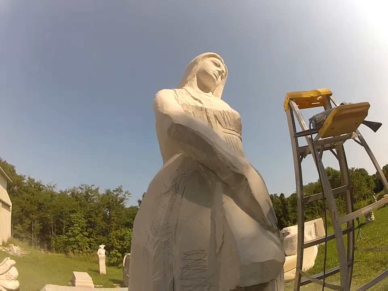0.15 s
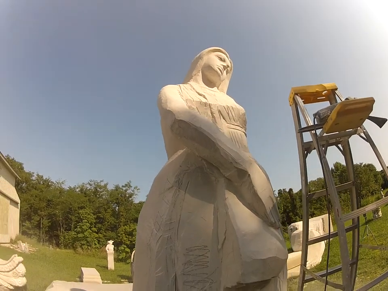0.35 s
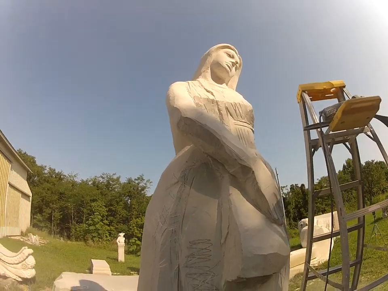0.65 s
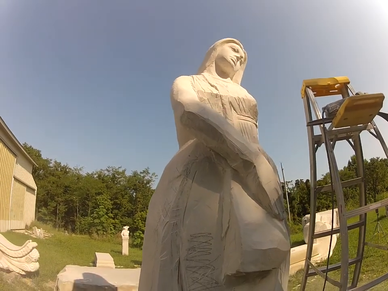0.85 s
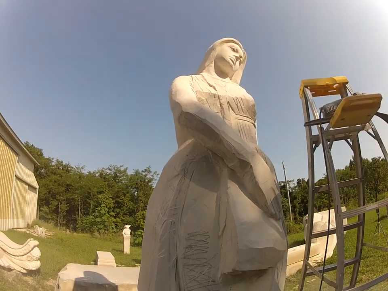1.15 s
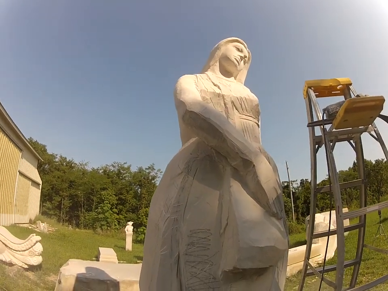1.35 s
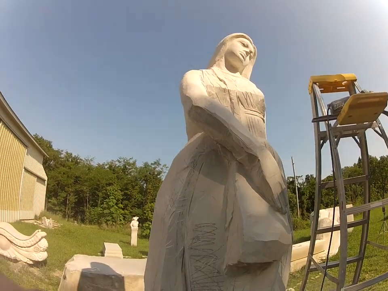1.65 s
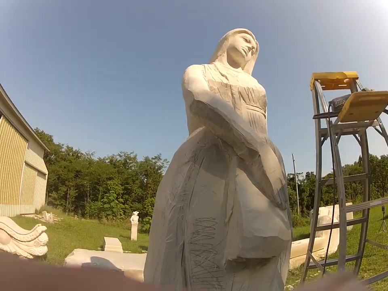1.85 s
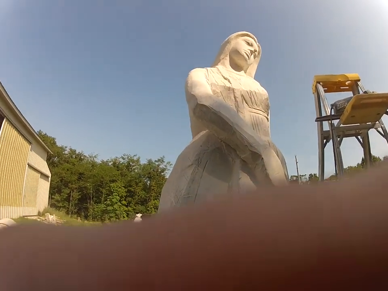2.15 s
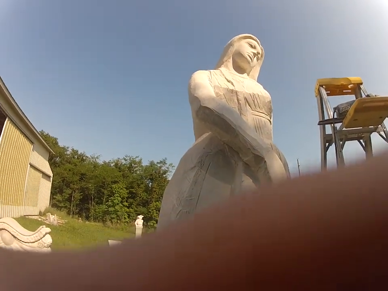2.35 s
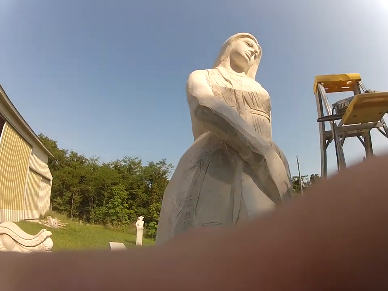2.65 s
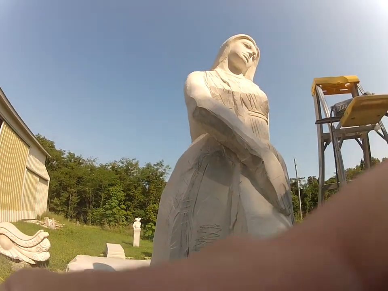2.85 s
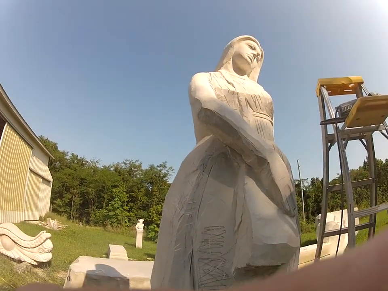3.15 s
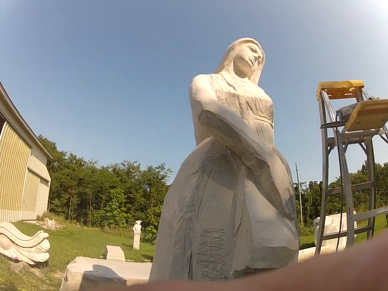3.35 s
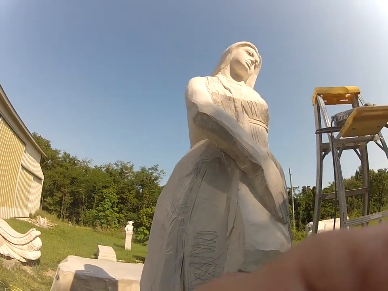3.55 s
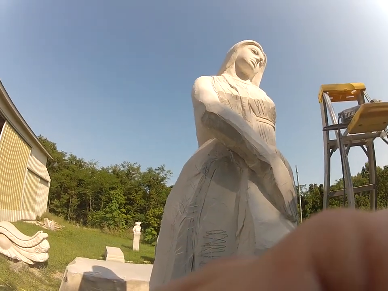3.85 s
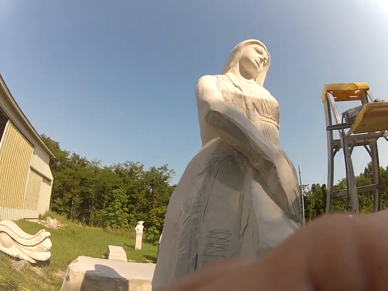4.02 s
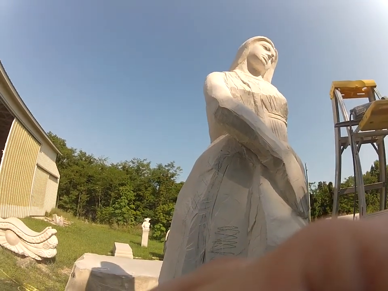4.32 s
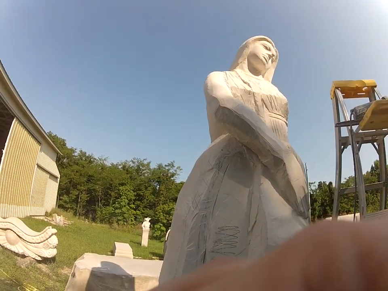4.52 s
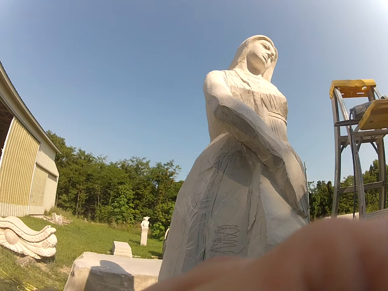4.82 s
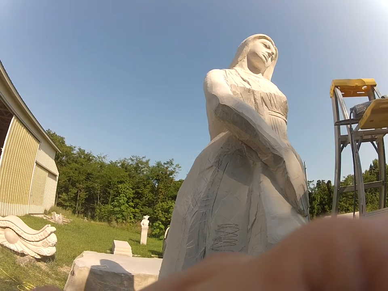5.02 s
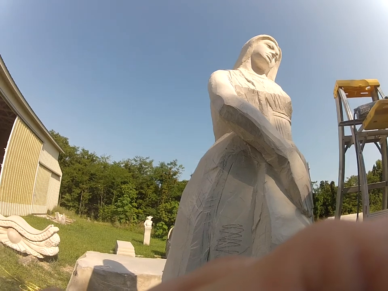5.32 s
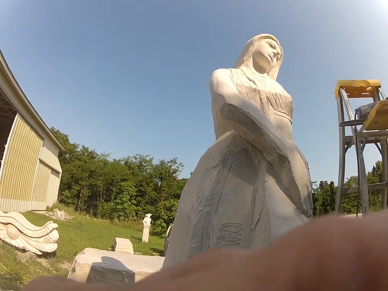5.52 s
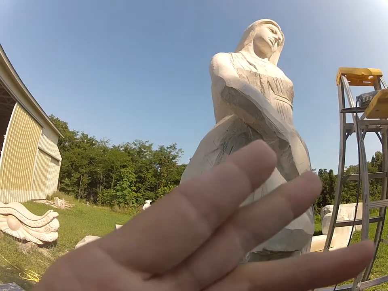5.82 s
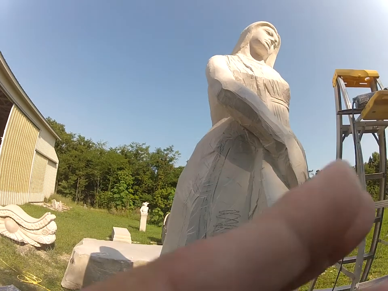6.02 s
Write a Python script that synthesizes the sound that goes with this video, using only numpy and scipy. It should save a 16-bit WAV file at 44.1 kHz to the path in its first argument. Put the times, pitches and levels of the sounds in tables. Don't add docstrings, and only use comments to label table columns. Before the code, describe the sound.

Gritty gear chatter and a falling thin whine from a stopping grinder, with loud close thumps, fingernail clicks and skin squeaks on plastic.

```python
import sys
import numpy as np
from scipy import signal
from scipy.fft import rfft, irfft
from scipy.io import wavfile
from scipy.ndimage import uniform_filter1d, map_coordinates

SR = 44100
rng = np.random.default_rng(int(sys.argv[2]) if len(sys.argv) > 2 else 0)


def undo_db(level):
    steps = np.asarray(level, float) / 20
    return 10 ** steps


def materialize(psi):
    bounded = np.clip(np.atleast_2d(psi).T, -1, 1)
    quanta = np.round(bounded * 32767).astype(np.int16)
    wavfile.write(sys.argv[1], SR, quanta)


N = 272538
HOLD_HZ = 12000

# hz, gain_db
YARD_COLOUR = [(70, -21.5), (110, -3.5), (200, -1), (400, -6), (800, -15), (1500, -9), (5900, -43)]
# time_s, level_db
YARD_LEVEL = [(0, -62), (3, -59.5), (6.18, -64.5)]

# time_s, level_db
TREMBLE_LEVEL = [(0.0, -60.5), (1.7, -56), (1.89, -48.5), (2.29, -55), (3.34, -54.5), (3.6, -38.5),
                 (3.77, -51.5), (4.44, -56.5), (5.56, -53), (5.82, -60), (6.18, -64)]
# hz, gain_db
MOUNT_COLOUR = [(15, -26), (30, -11), (48, 3), (60, 1.5), (75, -9), (100, -12), (200, -41.5)]
# start_s, first_swing, t60_s
SWINGS = [(1.045, -0.052, 0.26), (1.072, 0.11, 0.11), (1.342, -0.012, 0.47), (1.756, 0.032, 0.18),
          (1.879, -0.057, 0.27), (2.348, 0.023, .18), (2.587, 0.025, 0.36), (2.949, .04, 0.21),
          (3.03, 0.059, 0.23), (4.04, -0.014, 0.25), (4.169, 0.016, 0.18), (5.631, 0.064, .19)]
# start_s, first_swing, ring_hz
KNOCKS = [
    (1.3126, 0.16, 279),
    (1.323, 0.021, 224),
    (2.574, -.04, 141),
    (2.924, 0.07, 126),
    (2.9396, -0.16, 247),
    (3.293, 0.0089, 250),
    (3.418, 0.023, 72),
    (5.595, 0.12, 175),
]
# start_s, first_swing, swing_hz
PUSHES = [
    (3.468, 0.23, 70),
    (3.5746, -0.42, 49),
    (3.5804, 1.33, 134),
    (3.585, -0.098, 30),
    (5.552, .25, 58.7),
    (5.5601, 0.5, 87.5),
    (5.563, -2.3, 108),
    (5.5746, -0.47, 190),
    (5.5765, 1.15, 121),
    (5.62, 0.43, 92),
]
# start_s, peak_db, ring_hz, t60_s, snap
TAPS = [(1.034, -20, 980, 0.0049, -.04), (1.075, -23.5, 1920, 0.01, 0.014),
        (1.313, -9.5, 1160, 0.017, -0.13), (1.322, -25, 1150, 0.018, 0.022),
        (2.9402, -16.5, 1984, 0.016, -0.26), (3.032, -23.5, 1190, 0.018, 0.065),
        (3.292, -23.5, 1970, 0.014, -0.1), (2.869, -39, 2030, 0.011, .005), (3.353, -39, 2300, .008, .005),
        (3.42, -28, 900, 0.0088, 0.044), (5.5542, -36, 1100, .006, 0.059),
        (3.5648, -27.5, 2040, 0.019, .001), (3.5821, -11, 1110, .011, 0.63),
        (3.582, -7.5, 2550, 0.0092, 0.16), (3.609, -19, 2080, 0.014, 0.0055),
        (3.656, -29, 2100, 0.0056, .01), (5.5627, -19.5, 2270, 0.013, 0.096),
        (5.597, -27.5, 1200, 0.016, 0.22), (5.6212, -44, 1000, .0075, 0.11),
        (5.625, -26, 1154, 0.046, -0.018)]

# start_s, hardest_s, end_s, hiss_db, squeak_db
RUBS = [(1.033, 1.083, 1.11, -53, -49), (1.21, 1.246, 1.285, -49.5, -50), (1.293, 1.311, 1.367, -47, -42),
        (1.475, 1.481, 1.515, -64, -64), (1.595, 1.625, 1.668, -57.5, -51),
        (1.745, 1.791, 1.812, -57.5, -51), (1.965, 2.037, 2.11, -56, -49.5), (2.12, 2.24, 2.265, -62, -53),
        (2.28, 2.374, 2.42, -55.5, -44.5), (2.425, 2.432, 2.515, -55, -47), (2.52, 2.57, 2.618, -37.5, -42),
        (2.638, 2.69, 2.708, -56.5, -52), (2.738, 2.792, 2.803, -62, -57), (2.868, 2.92, 2.98, -54, -41.5),
        (2.988, 3.038, 3.1, -53, -39), (3.107, 3.205, 3.22, -54.5, -43), (3.395, 3.477, 3.495, -53.5, -43),
        (3.564, 3.574, 3.582, -49, -43), (3.585, 3.59, 3.715, -82, -53), (3.718, 3.73, 3.768, -57.5, -46),
        (3.98, 4.002, 4.045, -64.5, -50.5), (5.553, 5.568, 5.605, -53.5, -38),
        (5.585, 5.591, 5.603, -43, -32), (5.614, 5.63, 5.655, -50.5, -32)]
# start_s, hardest_s, end_s, drag_db
SHIFTS = [(1.03, 1.06, 1.1, -43.5), (1.29, 1.31, 1.373, -40), (1.49, 1.52, 1.4, -53.5),
          (1.6, 1.625, 1.66, -58), (1.74, 1.8, 1.83, -48.5), (1.97, 2.04, 2.11, -46),
          (2.14, 2.24, 2.29, -46.5), (2.31, 2.42, 2.5, -47), (2.54, 2.61, 2.64, -45.5),
          (2.65, 2.685, 2.71, -50), (2.89, 2.94, 2.985, -39), (2.99, 3.03, 3.13, -38.5),
          (3.14, 3.18, 3.23, -53.5), (3.39, 3.43, 3.51, -42.5), (3.54, 3.59, 3.68, -51),
          (3.71, 3.76, 3.79, -49), (3.98, 4.01, 4.05, -57), (5.55, 5.57, 5.61, -25),
          (5.613, 5.625, 5.66, -44)]
# hz, gain_db
HISS_COLOUR = [(900, -26), (1500, -11.5), (1850, 0), (2400, 0), (2900, -9), (3400, -1.5), (3700, -0.5),
               (4200, -15.5), (5100, -11), (5950, -6.5)]
# hz, gain_db
SQUEAK_COLOUR = [(300, -19.5), (600, -16), (950, -9.5), (1150, -0.5), (1400, -2.5), (1700, -42.5),
                 (2500, -26.5)]
# hz, gain_db
DRAG_COLOUR = [(60, -5), (130, 2.5), (250, -0.5), (500, -13.5), (900, -40.5)]

# first_s, last_s, blow_count, peak_db
RATTLE_RUNS = [(0.0284, 0.147, 4, -35.5), (0.174, 0.196, 2, -33), (0.234, 0.4125, 7, -34.5),
               (0.435, 0.6165, 7, -35), (0.654, 0.755, 4, -33.5), (0.7945, 1.068, 10, -34),
               (1.0953, 1.2503, 7, -36), (1.289, 1.702, 15, -35), (1.7233, 1.9651, 9, -35.5),
               (2.0151, 2.2603, 10, -37), (2.2754, 2.565, 10, -37), (2.641, 2.687, 3, -35.5),
               (2.7394, 3.074, 9, -36), (3.233, 3.4177, 7, -36), (3.474, 3.6526, 5, -33.5),
               (3.6905, 3.944, 10, -38.5), (3.985, 4.003, 2, -38), (4.0283, 4.1685, 4, -37),
               (4.2062, 4.3064, 3, -36.5), (4.3463, 4.6058, 6, -36), (4.6344, 4.7538, 4, -39),
               (4.787, 5.034, 7, -38), (5.0803, 5.166, 3, -38), (5.202, 5.2905, 3, -39),
               (5.335, 5.356, 2, -41), (5.399, 5.467, 2, -37), (5.514, 5.6196, 5, -39.5),
               (5.6755, 5.7255, 3, -39.9), (5.7753, 5.9312, 4, -40.0), (5.976, 6.15, 5, -38.5)]
# centre_hz, width_hz, level_db
BODY_MODES = [(1030, 55, -7), (1143, 91, -2.5), (1380, 70, -4), (1874, 227, -4.5), (2026, 96, 0),
              (2209, 200, -2.5), (2482, 120, -2), (2817, 220, -9.5), (3194, 190, -8.5), (3570, 174, -10),
              (4800, 240, -32.5)]
# hz, gain_db
BODY_BED = [(200, -36), (500, -23), (900, -21), (1300, -22), (1570, -34), (1800, -17), (2500, -11),
            (3900, -19), (4500, -31), (5950, -48)]
# time_s, level_db
WHIRR_LEVEL = [(0.0, -55), (2.5, -56), (2.75, -61), (3.15, -59.5), (4.51, -65), (5.66, -66), (5.85, -68.5),
               (6.18, -63)]
# hz, gain_db
WHIRR_TILT = [(600, 4.5), (1500, -7.5), (2500, 0), (3800, -2.5), (4800, 12.5), (5900, 24)]
# centre_hz, width_hz, level_db
HOUSING_MODES = [(2200, 160, -60), (2515, 200, -50), (2900, 130, -64), (3150, 130, -61), (4680, 300, -78)]
# whine_hz, level_db
SECOND_PARTIAL = [(2450, -95), (2700, -84), (2850, -77), (2950, -68), (3000, -72)]
# time_s, pitch_hz, level_db
WHISTLE = [(0, 2425, -46.5), (.3, 2354, -55.5), (.6, 2232, -59.5), (1, 2028, -52.5), (2.5, 1967, -52),
           (3.2, 1930, -55), (4, 1912, -82)]

# hz, gain_db
TOP_EDGE = [(15250, 0.37), (15450, -22), (16400, -34), (17000, -63)]


def unit(x):
    return x / np.sqrt(np.mean(x ** 2) + 1e-20)


def along(points, hz):
    f, db = np.transpose(points)
    return undo_db(np.interp(np.log(hz + 1), np.log(f + 1), db))


def curves(rows):
    time_s, *columns = np.transpose(rows)
    return [np.interp(np.arange(N) / SR, time_s, c) for c in columns]


def wobble(rate_hz):
    knots = rng.standard_normal(int(N * rate_hz / SR) + 4)
    return map_coordinates(knots, [np.arange(N) * rate_hz / SR])


def coloured(x, gain):
    m = 2 ** 14
    cepstrum = irfft(np.log(gain(np.fft.rfftfreq(m, 1 / SR)) + 1e-6))
    cepstrum[1:m // 2] *= 2
    cepstrum[m // 2 + 1:] = 0
    return signal.fftconvolve(x, irfft(np.exp(rfft(cepstrum))))[:N]


def noise(gain):
    return unit(coloured(rng.standard_normal(N), gain))


def resonances(modes, hz):
    return np.sqrt(sum((undo_db(db) / (1 + (2 * (hz - c) / w) ** 2)) ** 2 for c, w, db in modes))


def yard():
    return undo_db(curves(YARD_LEVEL)[0] + wobble(6)) * noise(lambda hz: along(YARD_COLOUR, hz))


def tremble():
    return undo_db(curves(TREMBLE_LEVEL)[0] + 2.5) * noise(lambda hz: along(MOUNT_COLOUR, hz))


def thumps():
    mount_hz, shell_cycles, push_cycles = 57.9, 7.3, 1.78
    events = [(s, swing, mount_hz, t60_s) for s, swing, t60_s in SWINGS]
    events += [(s, swing, hz, shell_cycles / hz) for s, swing, hz in KNOCKS]
    events += [(s, swing, hz, push_cycles / hz) for s, swing, hz in PUSHES]
    out, t = np.zeros(N + SR), np.arange(SR // 2) / SR
    for s, swing, hz, t60_s in events:
        envelope = (1 - np.exp(-6 * hz * t)) * undo_db(-60 * t / t60_s)
        out[round(s * SR):][:len(t)] += swing * envelope * np.sin(2 * np.pi * hz * t)
    return out[:N]


def taps():
    overtone, crack_cycles = 1.72, 0.25
    attack_s, snap_s = 0.00038, 0.00068
    out, t = np.zeros(N + SR), np.arange(SR // 2) / SR
    for s, db, hz, t60_s, snap in TAPS:
        ring = 1.04 * np.sin(2 * np.pi * hz * t) + 0.69 * np.sin(2 * np.pi * overtone * hz * t)
        span = crack_cycles * SR / hz
        crack = uniform_filter1d(rng.standard_normal(len(t)), size=round(span))
        crack *= 1.7 * np.sqrt(span / 5)
        tap = undo_db(db - 3.5 - 60 * t / t60_s) * (ring + crack) + 1.84 * snap * np.exp(-t / snap_s)
        out[round(s * SR):][:len(t)] += (1 - np.exp(-t / attack_s)) * tap
    return out[:N]


def case():
    return tremble() + thumps() + taps()


def strokes(rows):
    silent_db, light_db, edge_s = -95., -72.5, .003
    lands, lifts = 0.53, 0.47
    out = np.full((len(rows[0]) - 3, N), silent_db)
    for start, hardest, end, *levels in rows:
        at = np.arange(round((start - edge_s) * SR), round((end + edge_s) * SR))
        times = [start - edge_s, start, hardest, end, end + edge_s]
        for line, db in zip(out, levels):
            land_db = light_db + lands * (db - light_db)
            lift_db = light_db + lifts * (db - light_db)
            shape = np.interp(at / SR, times, [silent_db, land_db, db, lift_db, silent_db])
            line[at] = np.maximum(line[at], shape)
    return out


def hand():
    hiss_db, squeak_db = strokes(RUBS)
    drag_db, = strokes(SHIFTS)
    grains = undo_db(2.5 * wobble(300) + 2 * wobble(60)) * rng.standard_normal(N)
    hiss = unit(coloured(grains, lambda hz: along(HISS_COLOUR, hz) * (hz < HOLD_HZ / 2)))
    squeak = unit(coloured(grains, lambda hz: along(SQUEAK_COLOUR, hz)))
    slow_grains = undo_db(3 * wobble(60)) * rng.standard_normal(N)
    drag = unit(coloured(slow_grains, lambda hz: along(DRAG_COLOUR, hz)))
    return undo_db(hiss_db + 12.5) * hiss + undo_db(squeak_db - 1.5) * squeak + undo_db(drag_db) * drag


def body(hz):
    return np.sqrt(resonances(BODY_MODES, hz) ** 2 + along(BODY_BED, hz) ** 2) * (hz < HOLD_HZ / 2)


def whirr():
    level_db = curves(WHIRR_LEVEL)[0] + 2.5 + 2.4 * wobble(30)
    return undo_db(level_db) * noise(lambda hz: body(hz) * along(WHIRR_TILT, hz))


def whistle():
    pitch_hz, level_db = curves(WHISTLE)
    tone = np.sin(2 * np.pi * np.cumsum(pitch_hz) / SR)
    return np.sqrt(2) * undo_db(level_db) * unit(wobble(280)) * tone


def whine():
    tooth_hz, sag_hz_per_s, ease_hz_per_s2, settle_hz_per_s3 = 4930, 580, 8, 1.067
    hz = np.polyval([settle_hz_per_s3, ease_hz_per_s2, -sag_hz_per_s, tooth_hz], np.arange(N) / SR)
    phase = 2 * np.pi * np.cumsum(hz + 1.5 * wobble(25)) / SR
    first = resonances(HOUSING_MODES, hz) * undo_db(2.4 * wobble(10)) * np.sin(phase)
    second = along(SECOND_PARTIAL, hz) * np.sin(2 * phase) * (hz < HOLD_HZ / 4)
    return np.sqrt(2) * (first + second)


def rattle():
    chatter_s, growth_per_s, scatter_db = 0.0077, 0.11, .9
    events = []
    for first, last, blows, db in RATTLE_RUNS:
        events += [(s, db) for s in np.linspace(first, last, round(blows))]
    t = np.arange(SR // 20) / SR
    start_s = np.array(events)[:, :1]
    lasts_s = chatter_s * (1 + growth_per_s * start_s) * undo_db(rng.standard_normal((len(events), 1)))
    shape = (1 - np.exp(-t / .0008)) * (np.exp(-(t / lasts_s) ** 2) + .3 * undo_db(-60 * t / .09))
    bursts = shape * rng.standard_normal((len(events), len(t)))
    bursts *= np.linalg.norm(shape[0]) / np.linalg.norm(bursts, axis=1, keepdims=True)
    out = np.zeros(N + SR)
    for (s, db), burst in zip(events, bursts):
        out[round(s * SR):][:len(t)] += undo_db(db + scatter_db * rng.standard_normal()) * burst
    body_rms = np.sqrt(np.mean(body(np.linspace(1, SR / 2, 8000)) ** 2))
    return undo_db(-7.5) * coloured(out[:N] * undo_db(1.2 * wobble(300)), body) / body_rms


def grinder():
    return whirr() + whistle() + whine() + rattle()


def scene():
    return (yard() + case() + hand() + grinder())[None]


def low_pass(x):
    return signal.sosfilt(signal.butter(12, 16470, fs=SR, output="sos"), x)


def record(dry):
    hiss_db = -104
    m = 147 * 2048
    period = m * HOLD_HZ // SR
    k = np.arange(m // 2 + 1)
    dry = dry / (1 + np.abs(dry / .97) ** 8) ** (1 / 8)
    base = rfft(dry, m)[:, :period // 2 + 1]
    base = base / (1 + (k[:period // 2 + 1] / period / 0.47) ** 24)
    cycle = np.concatenate([base, np.conj(base[:, -2:0:-1])], axis=1)
    hold = np.sinc(k / period) * np.exp(-1j * np.pi * k / period)
    held = irfft(cycle[:, k % period] * hold * along(TOP_EDGE, k * SR / m), m)[:, :N]
    mix = held + undo_db(hiss_db) * rng.standard_normal(held.shape)
    return low_pass(mix)


dry = scene()
out = record(dry)
materialize(out)
```